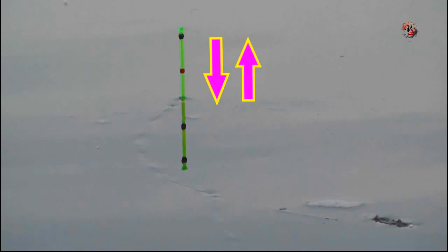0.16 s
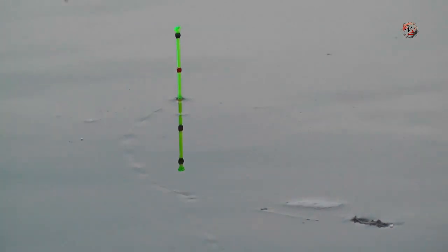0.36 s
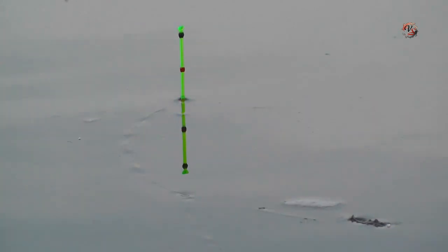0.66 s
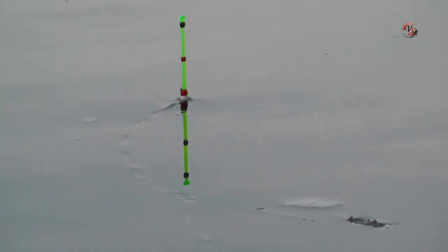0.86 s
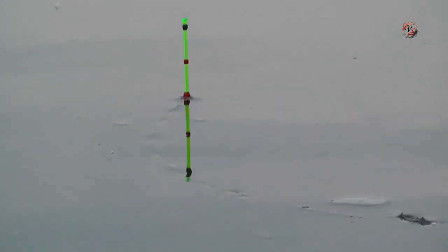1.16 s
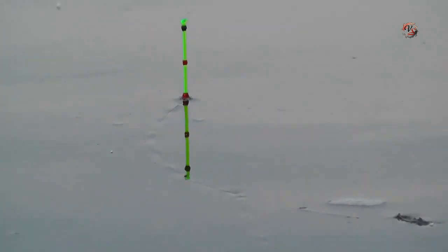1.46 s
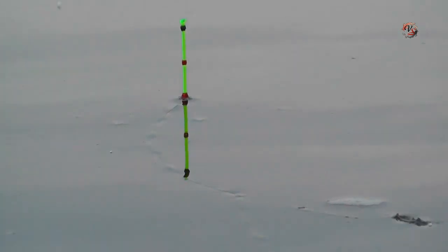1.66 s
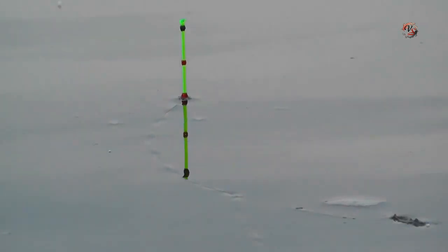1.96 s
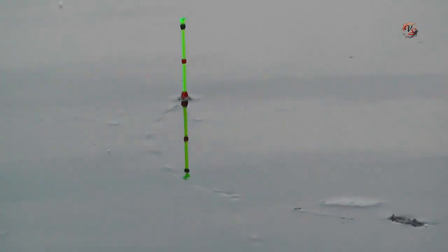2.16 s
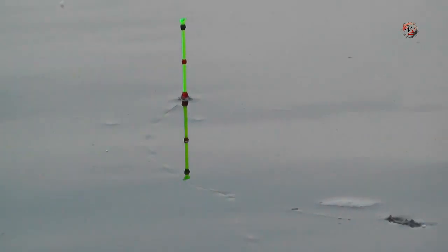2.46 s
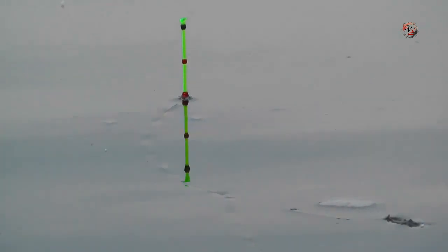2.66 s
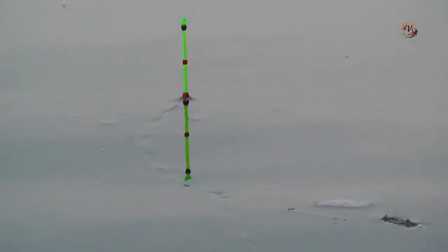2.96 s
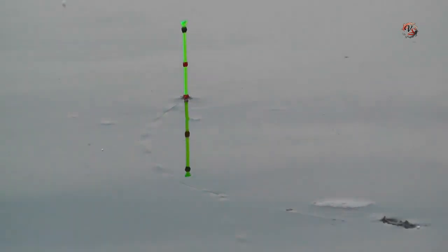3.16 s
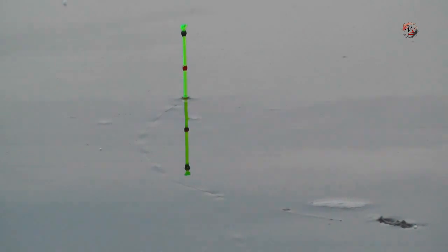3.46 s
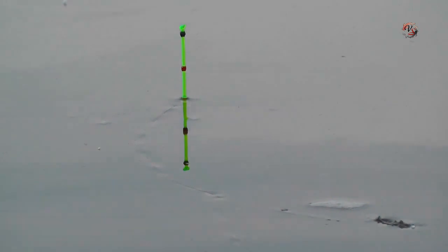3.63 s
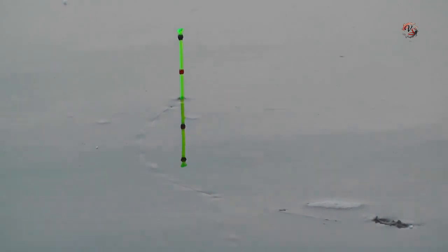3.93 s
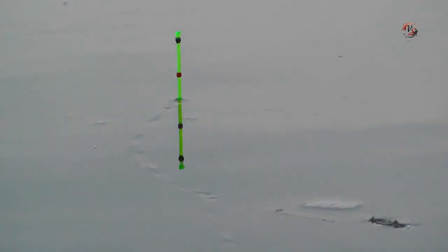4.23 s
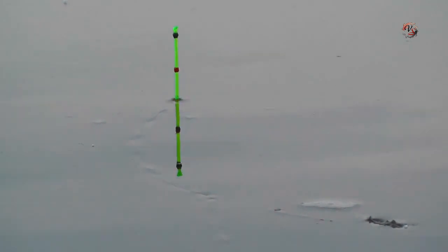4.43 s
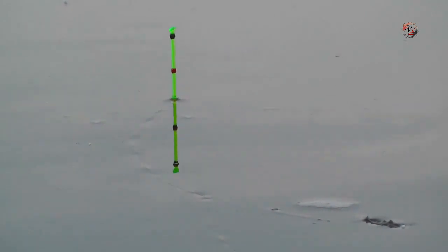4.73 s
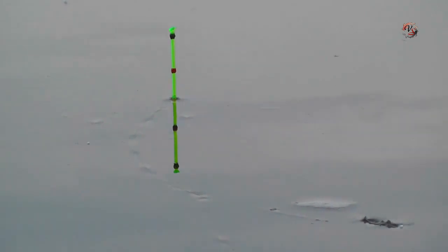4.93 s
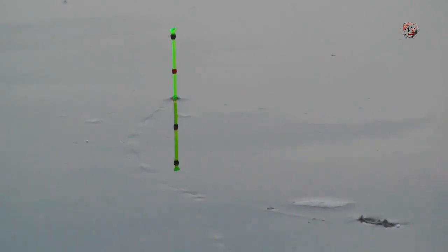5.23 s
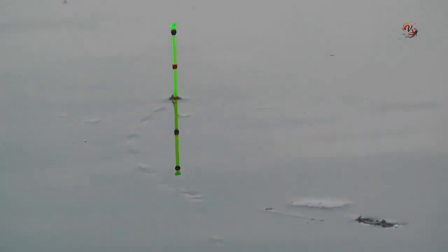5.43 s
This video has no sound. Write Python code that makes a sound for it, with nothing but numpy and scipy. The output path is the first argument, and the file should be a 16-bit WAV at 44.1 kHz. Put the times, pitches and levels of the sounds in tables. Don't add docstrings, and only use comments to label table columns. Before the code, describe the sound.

Short buzzy frog chirps and clear little bird whistles overlap at an open pond. The opening is busy, including two throbbing croaks; the middle thins to weak, distant rasps; the end grows dense again with arched whistles and nasal squeaks. Low bird hoots recur faintly over airy hiss, a far motor hum and electrical fizz. Close water echoes die quickly, and the sound starts late and cuts out twice.

```python
import sys
import numpy as np
from scipy import signal
from scipy.io import wavfile
from scipy.ndimage import uniform_filter1d

SR = 44100
rng = np.random.default_rng(int(sys.argv[2]) if len(sys.argv) > 2 else 0)


def gain_from_db(level_db):
    decades = np.asarray(level_db, float) / 20
    return 10 ** decades


def file_out(sig):
    cols = np.atleast_2d(sig).T
    lim = np.clip(cols, -1, 1)
    pcm = np.round(lim * 32767).astype(np.int16)
    wavfile.write(sys.argv[1], SR, pcm)


N = 246519

# frequency_hz, density_db (per Hz)
AIR_SPECTRUM = [(12, -95), (20, -54.5), (65, -31.5), (217, -11.5), (282, -7), (418, -11.5), (573, -1),
                (688, -5), (784, -3), (1430, -7.5), (1720, -11.5), (3310, -8.5), (3680, -14), (6220, -19),
                (10500, -32.5), (13600, -66.5), (22000, -120)]
# frequency_hz, side_minus_mid_db
AIR_WIDTH = [(30, 3), (70, 4.5), (200, -13.5), (360, -13), (660, -22.5), (1200, -18.5), (2190, -18),
             (4000, -17), (7280, -12), (10000, -6)]
# frequency_hz, level_db
MOTOR_ORDERS = [(91.5, -76), (274.5, -63), (301.5, -67), (366.1, -79.5)]
# start_s, fade_in_s, end_s
STRETCHES = [
    (0.284, 0.025, 1.0062),
    (1.071, 0.0048, 2.774),
    (2.805, 0.0023, 6),
]
SPARK_DELAYS = [.0065, .0008, .0014]
# time_s, level_db, centre_hz
TICKS = [(.617, -61.5, 5500), (0.63, -62, 4000), (0.669, -61, 5900), (0.693, -66.5, 6600),
         (.909, -59.5, 6470), (.911, -55, 2900), (0.86, -67, 6385), (1.31, -62, 4250),
         (3.365, -60.5, 3500), (5.137, -55.5, 5300), (5.3, -54, 5100), (5.335, -58, 4600),
         (5.52, -53.5, 1960), (5.555, -53, 1800)]
# start_s, length_s,
# pitch_hz, level_db
HOOTS = [(0.312, .08, 651, -58), (1.432, 0.034, 1419, -54), (1.474, 0.089, 649, -54), (1.55, 0.2, 550, -60),
         (1.775, 0.11, 563, -58.5), (2.48, 0.078, 650, -54), (2.568, .07, 582, -59.5),
         (2.839, 0.051, 576, -60.5), (3.494, 0.084, 646, -52.5), (3.818, 0.082, 578, -61.5),
         (4.47, 0.097, 657, -54.5), (4.75, 0.075, 582, -58), (5.507, 0.23, 678, -62.5)]
# start_s, length_s, first_hz, last_hz, level_db
PEEPS = [(0.28, .031, 2830, 2710, -44), (0.41, .034, 4570, 4750, -61.5), (1.118, .033, 6380, 6410, -64),
         (1.124, .054, 4820, 4960, -64.5), (1.146, .027, 6500, 6540, -65), (1.151, .015, 3100, 3890, -55),
         (1.179, .029, 4100, 3710, -59), (1.401, .07, 2978, 2840, -43.5), (3.355, .021, 5800, 5790, -60),
         (3.361, .034, 5230, 5260, -62.5), (3.371, 0.037, 3600, 3310, -58.5),
         (4.8, 0.034, 2500, 2390, -51.5), (3.459, .02, 4150, 4200, -64), (3.539, .039, 2780, 2750, -63),
         (3.704, .039, 1600, 2100, -63), (3.801, .014, 2700, 2140, -62), (5.061, .015, 1700, 1110, -58),
         (5.574, .024, 3520, 3710, -55)]
# start_s, hold_s, pitch_hz, second_harmonic_db, third_harmonic_db
SQUEAKS = [
    (5.102, 0.063, 1580, -45.5, -46.5),
    (5.261, 0.055, 1618, -51, -49.5),
]
# start_s, length_s, top_hz, last_hz, level_db
ARCHES = [
    (4.165, .095, 4310, 3720, -59),
    (4.5, .095, 4390, 3860, -59.5),
    (4.848, .1, 4370, 3490, -58),
    (5.243, .082, 4280, 3690, -56),
]
# start_s, hold_s, first_hz, last_hz, level_db
GLIDES = [(.399, 0.0082, 3400, 3900, -51.5), (.416, 0.032, 3900, 3790, -55.5),
          (0.459, 0.036, 3760, 3620, -44.5), (0.506, .028, 3630, 3520, -49.5),
          (0.545, .011, 3356, 3900, -46.5), (0.585, .008, 3600, 3700, -57),
          (.724, 0.018, 2950, 3540, -52.5), (0.749, 0.014, 4230, 4320, -54.5),
          (1.305, .075, 3607, 3503, -45), (3.589, 0.019, 4180, 4330, -52), (3.612, 0.013, 4320, 3260, -52),
          (3.632, 0.012, 3280, 3190, -52.5), (5.129, .005, 3700, 4050, -52.5),
          (5.159, .009, 3790, 4230, -45), (5.324, .011, 3900, 4160, -47), (5.473, 0.028, 3560, 3440, -50.5),
          (5.496, .057, 3476, 2650, -46.5), (5.564, 0.022, 2630, 2630, -50.5)]
# start_s, hold_s, pitch_hz, level_db, swell_db (over the hold)
FLATS = [
    (1.392, .09, 3560, -49, -3),
    (1.598, .045, 3535, -50, -1),
    (1.908, 0.061, 3028, -39.5, 2),
    (3.339, 0.016, 4490, -58.5, 4),
    (3.67, 0.064, 4272, -52, 9),
    (4.049, 0.08, 3273, -46, -4),
    (4.385, .084, 3285, -50, 1.5),
    (4.727, 0.1, 3234, -48.5, 1.5),
]
# start_s, hold_s, effort_db, sac_hz, swell_db (over the hold)
FIRST_FROG = [ (0.283, .02, -42.5, 2754, -3), (0.339, 0.03, -52, 2630, 4), (.385, 0.055, -44.5, 2620, -3.5),
              (0.467, .022, -42.5, 2784, 6), (.508, .03, -44, 2800, -8.5), (0.687, .015, -51, 2640, 2),
              (.715, .04, -46, 2630, -4), (0.764, 0.017, -48.5, 2785, -2.5),
              (.8, 0.0068, -44.5, 2780, -1.5), (.822, .035, -48, 2740, 2), (.95, .04, -50.5, 2710, 7.5),
              (1.376, .075, -42.5, 2858, 1), (1.47, .03, -45.5, 2890, -6), (1.858, .042, -43, 2893, -0.5),
              (1.914, .06, -44, 2963, -9.5)]
FAR_FROG = [ (2.175, .035, -53, 2395, 3.5), (2.22, .012, -46.5, 2520, -4.5),
            (2.252, .05, -53.5, 2485, -5.5), (2.465, .075, -54, 2450, 2.5), (2.86, .035, -54, 2526, 8),
            (3.0, .03, -50.5, 2526, -4), (3.07, 0.043, -53.5, 2555, 4), (3.12, .03, -45.5, 2572, -4),
            (3.186, 0.0098, -51, 2480, -1.5), (3.23, 0.027, -53, 2466, 4), (3.378, 0.011, -49, 2470, 0.5),
            (3.496, 0.0087, -50, 2370, -4.5), (3.705, 0.015, -55, 2500, 6.5), (3.83, .012, -55.5, 2480, -1)]
NEAR_FROG = [ (3.947, .045, -46, 2800, 5.5), (4.004, .033, -53.5, 2870, -2.5), (4.053, .046, -42, 2864, 1),
             (4.237, .044, -45, 2716, 2.5), (4.292, .033, -51.5, 2680, -5), (4.346, .043, -43, 2767, 3),
             (4.53, .052, -45, 2703, 2), (4.638, .046, -42.5, 2570, -3), (4.692, .033, -51, 2520, -2),
             (4.74, .068, -50.5, 2510, -0.5), (4.821, .054, -46.5, 2620, 4.5), (4.94, .046, -44, 2697, 3.5),
             (5.009, .044, -47, 2527, -4.5), (5.491, .03, -49, 2800, 1.5), (5.526, .06, -46.5, 2626, -1)]
# start_s, hold_s, effort_db, sac_hz, swell_db (over the hold)
TRILLS = [
    (1.127, .125, -49, 2794, 3.5),
    (1.617, .135, -40.5, 2853, -2.5),
]
# attack_s, release_s, sac_rise (0-1), pitch_spread (0-1), puff_unevenness_db
HABITS = [
    (.009, .03, 0, 0.05, 1.5),
    (0.0094, .022, 0.01, .055, 4.5),
    (.006, .014, .045, .055, 1.9),
]
# puff_rate_hz, upper_rasp_db
VOICES = [
    (170.3, -13.5),
    (150.5, -10.5),
    (204.7, -14.5),
]


def evened(x):
    return x / np.sqrt(np.mean(x ** 2) + 1e-20)


def noise(length):
    return rng.standard_normal(length)


def wander(length, size):
    return evened(uniform_filter1d(uniform_filter1d(noise(length), size), size))


def read(points, hz):
    f, value = np.transpose(points)
    return np.interp(np.log(hz + 1), np.log(f + 1), value)


def add(mix, s, sound):
    part = mix[round(s * SR):][:len(sound)]
    part += sound[:len(part)]


def unroll(rows):
    s, *columns = np.transpose(rows)
    t = np.arange(s[0], s[-1], 1 / SR)
    return [np.interp(t, s, c) for c in columns]


def envelope(start, hold, db, swell_db, attack, release, ends_db):
    s = start + np.cumsum([0, attack, hold, release])
    return s, db + np.array([ends_db, 0, swell_db, swell_db + ends_db])


def resonate(x, hz, width_hz):
    turn = np.exp(2j * np.pi * np.cumsum(hz * np.ones(len(x))) / SR)
    r = np.exp(-np.pi * width_hz / SR)
    return 2 * (turn * signal.lfilter([1 - r], [1, -r], x / turn)).real


def tone(hz, db, flutter_db, waver):
    turns = np.cumsum(hz * (1 + waver * wander(len(hz), size=90))) / SR
    level = np.sqrt(2) * gain_from_db(db + flutter_db * wander(len(hz), size=150))
    soft = signal.windows.tukey(len(hz), min(1, 0.006 * SR / len(hz)))
    return level * np.sin(2 * np.pi * turns) * soft


def air(calls_db):
    air_db, chorus_usual_db, follow = -53.5, -49.5, 0.23
    frames, hz = N // 256 + 5, np.fft.rfftfreq(1024, 1 / SR)
    a, b, c, d, patches = rng.standard_normal((frames, 513, 5)).T
    patches = uniform_filter1d(uniform_filter1d(patches, size=10, axis=0), size=12, axis=1)
    mid = a + 1j * b
    side = (c + 1j * d) * gain_from_db(read(AIR_WIDTH, hz))[:, None]
    excess_db = np.interp(np.arange(frames) * 256, np.arange(N), calls_db) - chorus_usual_db
    treble_db = np.clip(hz / 4500 - .6, 0, 1)[:, None] * follow * excess_db
    colour_db = read(AIR_SPECTRUM, hz)[:, None] + 2.0 * evened(patches) + treble_db
    colour = gain_from_db(colour_db + 0.25 * wander(frames, size=30))
    spectra = np.array([mid + side, mid - side]) * colour
    return gain_from_db(air_db) * evened(signal.istft(spectra, nperseg=1024, noverlap=768)[1][:, :N])


def motor():
    t, out = np.arange(N) / SR, np.zeros(N)
    for hz, db in MOTOR_ORDERS:
        level = np.sqrt(2) * gain_from_db(db + 0.77 * wander(N, size=3000))
        out += level * np.sin(2 * np.pi * hz * t + 0.38 * wander(N, size=6000))
    return out


def sparks():
    mains_hz, spark_hz, spark_db = 49.99, 6750, -65.5
    second_s, second_db = .008, -4
    t = np.arange(N) / SR
    delay = np.array(SPARK_DELAYS)[np.searchsorted([end for start, fade, end in STRETCHES], t)]
    cycles = (t - delay) * mains_hz + 1
    since = cycles % 1 / mains_hz
    uneven_db = 3.0 * rng.standard_normal((round(N / SR * mains_hz) + 3, 2))
    first_uneven_db, second_uneven_db = uneven_db[cycles.astype(int)].T
    burst = gain_from_db(first_uneven_db) * np.exp(-((since - .0012) / .0008) ** 2)
    burst += gain_from_db(second_uneven_db + second_db) * np.exp(-((since - .0012 - second_s) / 0.0007) ** 2)
    fizz = evened(resonate(resonate(noise(N), spark_hz, 3000), spark_hz, 3000))
    return gain_from_db(spark_db) * burst * fizz


def ticks():
    out, t = np.zeros(N), np.arange(1300) / SR
    for s, db, hz in TICKS:
        ring = evened(resonate(noise(len(t)), hz, 440))
        add(out, s - .008, gain_from_db(db) * ring * t / 0.0048 * np.exp(1 - t / 0.0071))
    return out


def hoots():
    out = np.zeros(N)
    for s, length, hz, db in HOOTS:
        sag = 1.005 - 0.028 * np.linspace(0, 1, round(length * SR)) ** 3
        hoot = tone(hz * sag, db - .6, flutter_db=3.0, waver=.018)
        add(out, s, hoot * signal.windows.tukey(len(sag), .4))
    return out


def peeps():
    out = np.zeros(N)
    for s, length, first_hz, last_hz, db in PEEPS:
        hz = np.linspace(first_hz, last_hz, round(length * SR))
        add(out, s, tone(hz, db, flutter_db=4.5, waver=0.0091))
    return out


def squeaks():
    attack_s, release_s, ends_db, scoop = 0.047, .025, -14, .965
    out = np.zeros(N)
    for start, hold, top_hz, second_top_db, third_top_db in SQUEAKS:
        s, shape_db = envelope(start, hold, 0, -3.5, attack_s, release_s, ends_db)
        pitch_hz = top_hz * np.array([scoop, 1, 1, 1])
        rows = np.transpose([s, pitch_hz, second_top_db + shape_db, third_top_db + 1.4 * shape_db])
        hz, second_db, third_db = unroll(rows)
        for order, db in zip((2, 3, 4), (second_db, third_db, third_db - 15.5)):
            add(out, start, tone(order * hz, db, flutter_db=4.0, waver=0.01))
        rasp = resonate(resonate(noise(len(hz)), 2.4 * hz, 1500), 2.4 * hz, 1500)
        add(out, start, gain_from_db(third_db - 7) * evened(rasp))
    return out


def whistle_paths():
    ends_db, scoop = -15, 0.95
    edges = .007, .012, ends_db
    arch_rise_hz, top_at, arch_swell_db = 397, 0.49, 5
    u = np.linspace(0, 1, num=24)
    rise = np.maximum(1 - u / top_at, 0)
    fall = np.maximum(u - top_at, 0) / (1 - top_at)
    for start, length, top_hz, last_hz, db in ARCHES:
        hz = top_hz - arch_rise_hz * rise ** 2 - (top_hz - last_hz) * np.sin(np.pi / 2.4 * fall) ** 2
        level_db = db + arch_swell_db * u + ends_db * (2 * u - 1) ** 16
        yield np.transpose([start + length * u, hz, level_db])
    for start, hold, first_hz, last_hz, db in GLIDES:
        s, level_db = envelope(start, hold, db, 0, *edges)
        yield np.transpose([s, np.interp(s, s[[0, -1]], [first_hz, last_hz]), level_db])
    for start, hold, hz, db, swell_db in FLATS:
        s, level_db = envelope(start, hold, db, swell_db, *edges)
        yield np.transpose([s, hz * np.array([scoop, 1, 1, 1]), level_db])


def whistles():
    out = np.zeros(N)
    for rows in whistle_paths():
        add(out, rows[0][0], tone(*unroll(rows), flutter_db=1.5, waver=0.005))
    return out


def croak(rows, pulse_hz, spread, uneven_db, throat_db):
    effort_db, sac_hz = unroll(rows)
    length = len(sac_hz)
    turns = np.cumsum(pulse_hz * np.exp(0.4046 * wander(length, size=200))) / SR
    strength, pitch = rng.standard_normal((100, 2))[turns.astype(int)].T
    puff = gain_from_db(uneven_db * strength) * np.sin(np.pi * (turns % 1) ** 1.27)
    detune = spread * np.clip(pitch, -1.6, 1.6) + .02 * wander(length, size=60)
    ring_hz = sac_hz * (1 + detune + np.linspace(-.025, .035, length))
    hiss = (puff + 0.13) * noise(length)
    sac = evened(puff * np.sin(2 * np.pi * np.cumsum(ring_hz) / SR))
    sac = sac + 0.46 * evened(resonate(resonate(hiss, sac_hz, 650), sac_hz, 800))
    below = signal.butter(6, 2200, "high", fs=SR, output="sos")
    sac = evened(signal.sosfilt(below, sac))
    throat = evened(resonate(resonate(hiss, 1.21 * sac_hz, 880), 1.21 * sac_hz, 780))
    low = evened(resonate(resonate(hiss, 0.64 * sac_hz, 650), 0.5 * sac_hz, 600))
    voice = sac + gain_from_db(throat_db) * throat + gain_from_db(-15.0) * low
    return gain_from_db(effort_db) * voice * signal.windows.tukey(length, .08)


def frogs():
    ends_db, throb_s, trill_throb_db = -16, 0.0258, -5
    out = np.zeros(N)
    parts = zip((FIRST_FROG, FAR_FROG, NEAR_FROG, TRILLS), (0, 0, 0, trill_throb_db),
                HABITS + HABITS[:1], VOICES + VOICES[:1])
    for calls, throb_db, habit, (pulse_hz, throat_db) in parts:
        attack, release, rise, spread, uneven_db = habit
        for start, hold, db, hz, swell_db in calls:
            s, effort_db = envelope(start, hold, db, swell_db, attack, release, ends_db)
            sac_hz = hz * (1 + rise * (2 * (s - start) / (s[-1] - start) - 1))
            rows = np.transpose([s, effort_db, sac_hz])
            sound = croak(rows, pulse_hz, spread, uneven_db, throat_db)
            throb = 1 + np.cos(2 * np.pi * np.arange(len(sound)) / SR / throb_s)
            add(out, start, sound * gain_from_db(throb_db * throb))
    return out


def pond(x):
    taps = np.zeros((2, 9000))
    at = np.arange(60, 8980, 20) + rng.integers(0, 20, (2, 446))
    np.put_along_axis(taps, at, rng.choice([-1., 1.], at.shape), 1)
    taps *= gain_from_db(-60 * np.arange(9000) / SR / 0.13)
    taps[1] = 1.12 * taps[0] + 0.081 * taps[1]
    return signal.fftconvolve(x[None], taps / np.linalg.norm(taps[0]), axes=1)[:, :N]


def scene():
    calls = ticks() + hoots() + peeps() + squeaks() + whistles() + frogs()
    power = abs(uniform_filter1d(calls ** 2, size=8000))
    calls_db = 10 * np.log10(power + gain_from_db(-59.5) ** 2)
    return gain_from_db(-0.5) * calls + gain_from_db(-8) * pond(calls) + air(calls_db) + motor() + sparks()


def dropouts():
    t = np.arange(N) / SR
    on = sum(np.clip((t - start) / fade, 0, 1) * (t < end) for start, fade, end in STRETCHES)
    leak = uniform_filter1d(uniform_filter1d(on, size=1900), size=1500)
    return on, (1 - on) * np.maximum(leak, 0) * (t > .272)


def roll_off(x):
    return signal.sosfilt(signal.butter(12, 13860, fs=SR, output="sos"), x)


def record(dry):
    edge_hz, top_hz, mirror_hz = 10550, 13650, 16000
    mirror_db, gate_db, smear_db = -33, -103, -70.5
    on, leak = dropouts()
    smear = resonate(noise(2 * N), 2500, 5170).reshape(2, N)
    x = dry * on + gain_from_db(smear_db) * leak * smear
    mirror = gain_from_db(mirror_db) * x * np.cos(2 * np.pi * mirror_hz * np.arange(N) / SR)
    hz, t, z = signal.stft([x, mirror], SR, nperseg=1024)
    hz = hz[:, None]
    local = uniform_filter1d(uniform_filter1d(abs(z[1]).mean(0), size=5, axis=0), size=3, axis=1)
    ragged_hz = edge_hz - 250 * np.maximum(wander(len(t), size=3) + 0.18, 0)
    low = hz < ragged_hz
    top = (hz > edge_hz) & (hz < top_hz) & (local > gain_from_db(gate_db + (hz - 13200) / 350))
    mix = signal.istft(z[0] * low + z[1] * top, SR, nperseg=1024)[1][:, :N]
    return roll_off(mix)


dry = scene()
out = record(dry)
file_out(out)
```